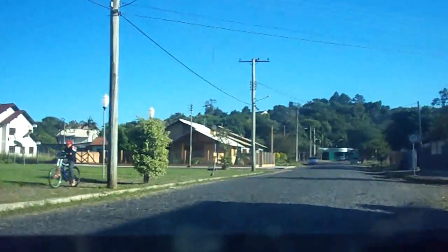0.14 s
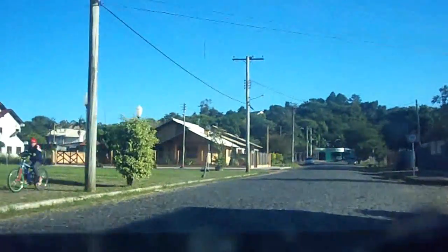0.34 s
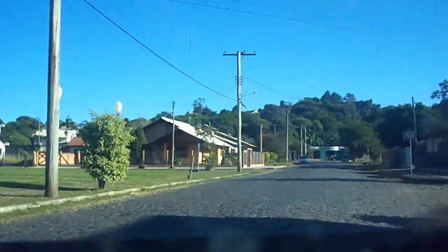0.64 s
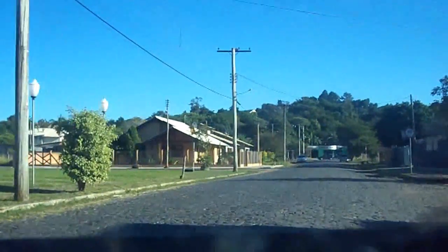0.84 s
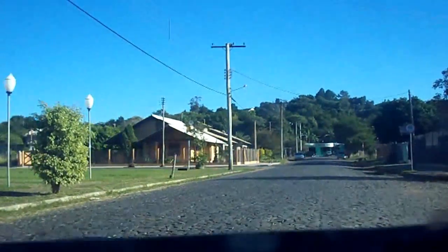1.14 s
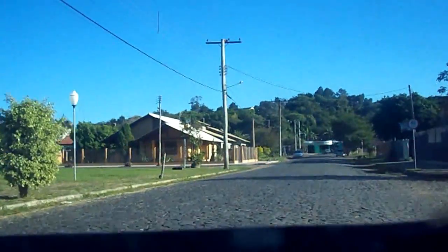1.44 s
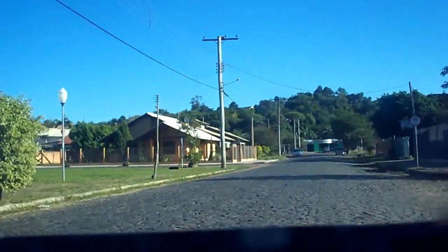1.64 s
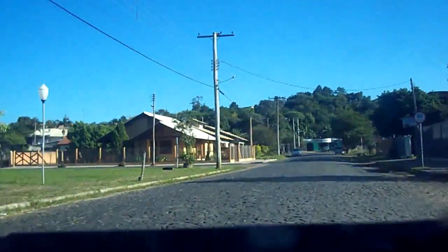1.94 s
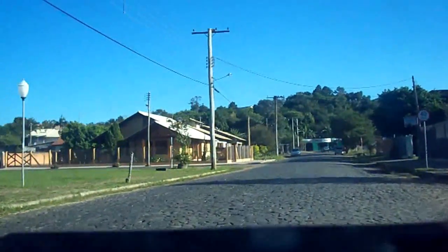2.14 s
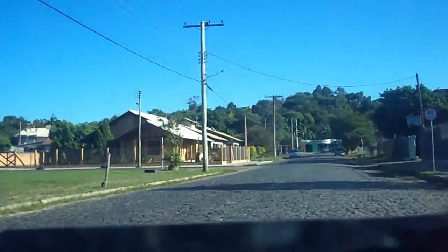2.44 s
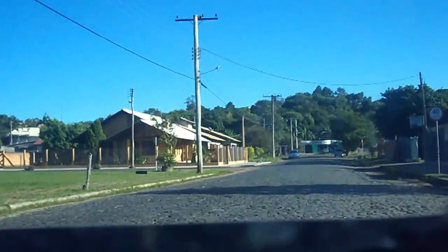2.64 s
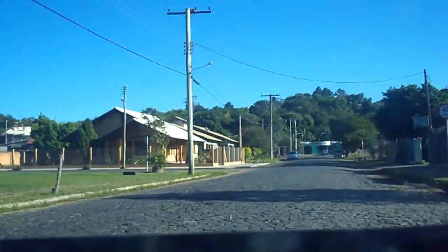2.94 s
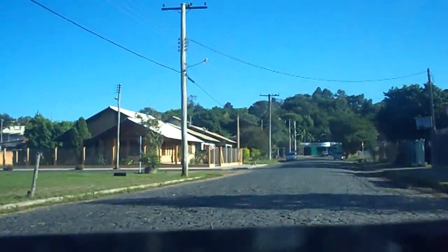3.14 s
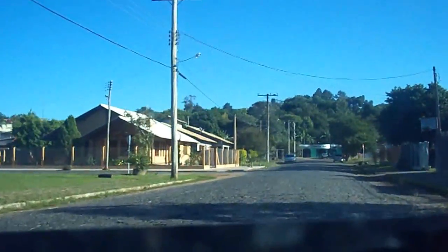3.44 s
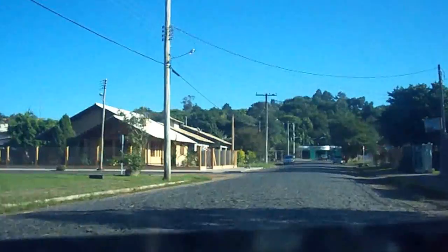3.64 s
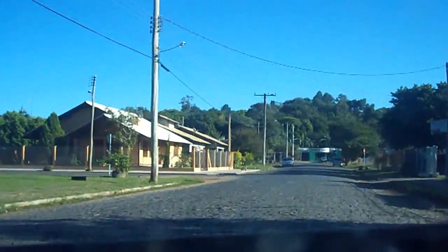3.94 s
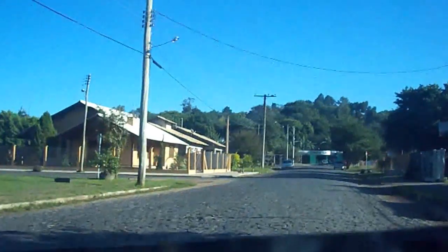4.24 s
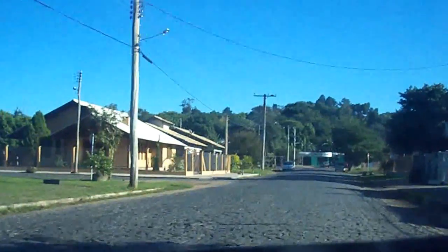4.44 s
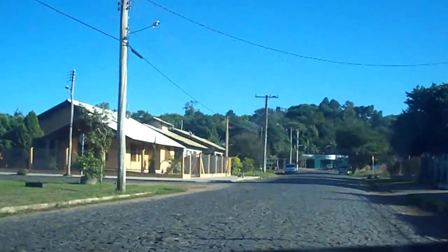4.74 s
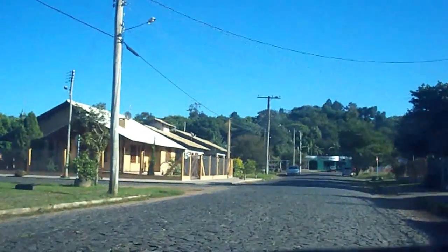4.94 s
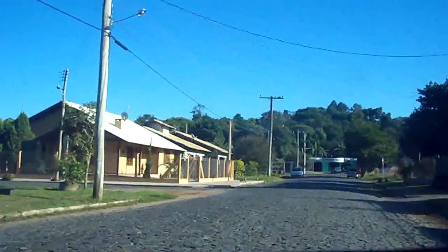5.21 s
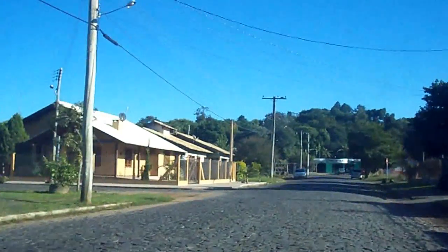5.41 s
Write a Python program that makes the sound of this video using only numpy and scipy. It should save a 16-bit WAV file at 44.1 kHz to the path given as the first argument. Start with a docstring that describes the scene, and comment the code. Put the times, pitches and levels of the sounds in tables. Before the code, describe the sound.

A car drives steadily over cobbles, heard from within. The body shudders deeply about thirty times a second, the cabin booms irregularly at bumps, and tyres hiss and drum. Hard plastic clacks and short hollow thuds rattle over it, dense early, sparser after, densest just past mid-way, then in uneven bursts to the end. Close, dry interior; strong bass clips roughly.

```python
"""Inside a car on cobblestones, microphone in the cabin: engine hum, tyre roar, boom and a body shake near 29 Hz.
At once loose plastic lands with hard ticks, about one per shake, and a hollow panel thuds, falling in pitch.
After 0.6 s the knocks thin out; the densest hard run comes from 2.8 to 3.5 s, then scattered bursts to the end.
Hum and shake are jostled sines, the road is shaped noise, small parts are random grains, rattles are struck modes.
The summed swings clip flat as the microphone overloads, and the top is cut."""
import sys
import numpy as np
from scipy import signal
from scipy.fft import rfft, irfft, next_fast_len
from scipy.io import wavfile

SR = 44100
rng = np.random.default_rng(int(sys.argv[2]) if len(sys.argv) > 2 else 0)


def master(y):
    """Save y as 16-bit WAV."""
    cut = np.clip(np.atleast_2d(y).T, -1, 1)
    pcm = np.round(cut * 32767)  # scale
    wavfile.write(sys.argv[1], SR, pcm.astype(np.int16))


N = 245637
TIME = np.arange(N) / SR


def from_db(db):
    """Decibels to gain."""
    return 10 ** (np.asarray(db) / 20)


def rms_one(x):
    """Scale to unit rms."""
    return x / np.sqrt(np.mean(x ** 2) + 1e-20)


def curve(rows, s=TIME):
    """Straight lines through (t/s, level/dB) rows, read at the moments s."""
    return np.interp(s, *np.transpose(rows))


def coloured(x, spectrum):
    """Filter a signal to a spectrum with sloping skirts beyond its ends; rms 1."""
    hz, level_db = np.transpose(spectrum)
    size = next_fast_len(N, True)
    bins = np.maximum(np.arange(size // 2 + 1) * SR / size, 1)
    gain = from_db(np.interp(np.log(bins), np.log(hz), level_db))
    low_skirt = np.minimum(bins / hz[0], 1) ** 2
    high_skirt = np.minimum(hz[-1] / bins, 1) ** 2
    return rms_one(irfft(rfft(x, size) * gain * low_skirt * high_skirt, size)[:N])


def noise(spectrum):
    """Noise of a given spectrum; rms 1."""
    return coloured(rng.standard_normal(N), spectrum)


def drift(rate_hz):
    """Slow random wander with rms 1."""
    return noise([(rate_hz / 10, 0), (rate_hz, 0)])


def clicks(times, heights):
    """One impulse per contact."""
    out = np.zeros(N)
    places = np.clip(np.round(times * SR).astype(int), 0, N - 1)
    np.add.at(out, places, heights)
    return out


def ring(blows, hz, t60):
    """Two-pole resonator: a unit click sets a decaying sine of height 1 ringing."""
    radius = from_db(-60 / (t60 * SR))
    angle = 2 * np.pi * hz / SR
    return signal.lfilter([0, np.sin(angle)], [1, -2 * radius * np.cos(angle), radius ** 2], blows + 1e-18)


def decays(blows, decay_s):
    """Each click becomes an exponential decay, an envelope for noise."""
    return signal.lfilter([1], [1, -np.exp(-1 / (decay_s * SR))], blows + 1e-18)


def cabin(x, t60, wet_db):
    """Close glass and trim add a short spray of reflections after 2 ms."""
    t = TIME[:SR // 5]
    tail = rng.standard_normal(len(t)) * from_db(-60 * t / t60) * (t > .002)
    tail /= np.sqrt(np.sum(tail ** 2))
    return x + from_db(wet_db) * signal.fftconvolve(x, tail)[:N]


def vibration(levels, turns, jostle_turns, flutter_db):
    """A sine that follows its level curve; the stones jostle its timing and strength."""
    strength = from_db(curve(levels) + flutter_db * drift(12.0))
    phase = turns + jostle_turns * drift(7.66)
    return np.sqrt(2) * strength * np.sin(2 * np.pi * phase)


# steady road wash, spectrum: f/Hz, level/dB (relative, per Hz)
WASH_SPECTRUM = [(600, 15), (1200, 2.5), (2400, -7), (4500, -3), (7500, -7.5), (9500, -15)]
WASH_DB = -53.5


def road_wash():
    """Steady shaped noise from the road beneath everything."""
    return from_db(WASH_DB) * noise(WASH_SPECTRUM)


# treble hiss of the tyres: t/s, level/dB (before HISS_DB)
HISS_LEVEL = [(0.02, -39), (0.53, -46.5), (1.57, -49), (1.89, -42), (2.06, -44), (2.69, -48.5), (3.08, -43),
              (3.36, -47), (3.47, -46), (3.62, -49), (3.76, -48), (4.72, -49.5), (5.18, -42.5), (5.57, -57)]
# treble of hiss, small parts and tick buzz: f/Hz, level/dB (relative, per Hz)
TREBLE_SPECTRUM = [(500, -2), (1300, 7.5), (2400, 8), (3000, 5.5), (3600, 6), (5000, 7), (6500, 5.5),
                   (7500, 2.5), (8500, -5.5), (10000, -27)]
HISS_DB = -4.5


def tyre_hiss(jolts, flutter_db=2.0):
    """Tyres hiss over the stones: treble noise that flutters with the jolts."""
    level_db = curve(HISS_LEVEL) + HISS_DB + flutter_db * jolts
    return from_db(level_db) * noise(TREBLE_SPECTRUM)


# engine hum: t/s, level/dB (before ENGINE_DB)
ENGINE_LEVEL = [(0.0, -9), (0.96, -18), (1.16, -10.5), (1.32, -21), (2.06, -16.5), (2.24, -31), (2.4, -12),
                (2.85, -18.5), (3.19, -14), (3.47, -28.5), (3.51, -17), (4.49, -29.5), (4.55, -15),
                (5.57, -19.5)]
ENGINE_HZ, ENGINE_DB = 48.56, -0.5   # the car holds its speed


def engine():
    """The engine hums on one low sine, unsteady in timing and strength."""
    return from_db(ENGINE_DB) * vibration(ENGINE_LEVEL, ENGINE_HZ * TIME, jostle_turns=0.11, flutter_db=5.5)


# wheel hop, spectrum: f/Hz, level/dB (relative, per Hz)
HOP_SPECTRUM = [(8, -20.5), (12, -16), (16, -1), (20, -6.5), (25, -7), (40, -20.5), (60, -20.5)]
HOP_DB = -16.0


def wheel_hop():
    """The wheels hop: very low noise, strongest near 16 Hz."""
    return from_db(HOP_DB) * noise(HOP_SPECTRUM)


# road roughness as tyre roar level, also driving small parts and light rattles: t/s, level/dB (before ROAR_DB)
ROUGHNESS = [(0.0, -16.5), (0.08, -34), (0.24, -39), (0.36, -23.5), (0.76, -39), (0.88, -24), (1.0, -42),
             (1.06, -27.5), (1.24, -36), (1.44, -34), (1.6, -29.5), (1.7, -39), (1.86, -34.5),
             (1.93, -30.5), (2.2, -29.5), (2.3, -38), (2.5, -31), (2.64, -38), (2.95, -25), (3.11, -36),
             (3.23, -25.5), (3.59, -33.5), (3.75, -21.5), (3.85, -45), (3.97, -29.5), (4.39, -32),
             (4.91, -31), (5.11, -37.5), (5.25, -25), (5.39, -36), (5.57, -35)]


def roughness(s):
    """Roughness of the road in dB at given moments."""
    return curve(ROUGHNESS, s)


# tyre roar, spectrum: f/Hz, level/dB (relative, per Hz)
ROAR_SPECTRUM = [(120, 6), (240, 4.5), (420, 4.5), (550, -4), (700, -4), (880, -9), (1150, -10.5),
                 (1600, -26.5), (2500, -28.5), (5000, -45)]
ROAR_DB = -1.5


def tyre_roar(jolts, lump_db=5.5):
    """Tyres drum over the stones: noise that follows the roughness and swells at each jolt."""
    return from_db(roughness(TIME) + ROAR_DB + lump_db * jolts) * noise(ROAR_SPECTRUM)


def grains(per_s, size_db):
    """Small contacts at random moments, a few much stronger than the rest."""
    sizes = from_db(size_db * np.minimum(rng.exponential(1, N), 3)) * rng.choice([-1, 1], N)
    return sizes * (rng.random(N) < per_s / SR)


CHATTER_DB, GRAIN_DB = -49.5, 3   # level on average road, and a trim added to it
CHATTER_FOLLOWS = 0.75   # share of the roughness swing


def small_fittings(jolts, clump_db=6.0):
    """Jolts stir small fittings into clumps of grains, close by, with a short cabin spray."""
    roar_db = roughness(TIME)
    level_db = CHATTER_DB + GRAIN_DB + CHATTER_FOLLOWS * (roar_db - roar_db.mean())
    contacts = grains(per_s=970, size_db=10.5) * from_db(clump_db * np.minimum(jolts, 1))
    chatter = coloured(contacts, TREBLE_SPECTRUM)
    return from_db(level_db) * cabin(chatter, t60=0.027, wet_db=-17.5)


def road():
    """Tyres and small fittings share the same random jolts over a steady wash."""
    jolts = drift(50)
    return road_wash() + tyre_hiss(jolts) + tyre_roar(jolts) + small_fittings(jolts)


# bumps where the cabin boom surges: t/s, level/dB (before SURGE_DB and BOOM_DB)
SURGES = [(0.038, -11.5), (0.23, -20), (0.35, -19), (0.66, -13.5), (0.89, -12), (1.07, -18), (1.62, -16.5),
          (2.06, -11.5), (2.3, -15), (2.461, -11), (2.87, -17), (3.03, -16), (3.26, -13.5), (3.44, -14),
          (3.66, -18.5), (3.919, -14.5), (4.109, -20), (4.39, -25), (4.5, -15.0), (4.69, -19.5), (4.8, -18),
          (4.92, -14.5), (5.36, -21), (5.51, -21.5)]
# cabin boom, spectrum: f/Hz, level/dB (relative, per Hz)
BOOM_SPECTRUM = [(45, -13.5), (65, -0.5), (90, -0.5), (115, -4.5), (140, -2.5), (200, -13), (260, -15),
                 (400, -28.5)]
SURGE_S, SURGE_DB = 0.034, -3.5   # time constant of the bell-shaped power, and trim
STEADY_BOOM_DB, BOOM_DB = -22, 0   # boom between surges, and trim of both


def suspension():
    """The cabin booms all the time and surges as the suspension takes each bump."""
    power = from_db(STEADY_BOOM_DB) ** 2
    for s, level_db in SURGES:
        power = power + from_db(level_db + SURGE_DB) ** 2 * np.exp(-((TIME - s) / SURGE_S) ** 2)
    return from_db(BOOM_DB) * np.sqrt(power) * noise(BOOM_SPECTRUM)


SHAKE_HZ, SHAKE_DB = 29.31, -0.28   # nominal rate: the car holds its speed
LANDING_TURN = 0.54   # where in the swing the plastic lands, in turns: on the way down


def landings():
    """Times of the hard landings: the strongest contact of each swing."""
    s, level_db = np.transpose(TICKS)
    same_swing = np.abs(s[:, None] - s) < .022
    strongest_db = np.where(same_swing, level_db, -np.inf).max(axis=1)
    return s[level_db >= strongest_db]


def shake_turns():
    """Swings of the body counted over time; a whole number of them passes between two hard landings."""
    s = np.r_[0, landings(), TIME[-1]]
    swings = np.maximum(np.round(np.diff(s) * SHAKE_HZ), 1)
    return np.interp(TIME, s, np.r_[0, np.cumsum(swings)])


# body shake: t/s, level/dB (before SHAKE_DB)
SHAKE_LEVEL = [(0.0, -5.5), (0.26, -4), (0.62, -23.5), (0.7, -6), (1.58, -12.5), (1.62, -8.5), (2.4, -8),
               (2.44, -14), (2.74, -5.5), (2.81, -21), (2.89, -5.5), (2.99, -24), (3.07, -6.5),
               (3.53, -9.5), (3.57, -16), (3.67, -7.5), (3.91, -18.5), (4.01, -10), (4.39, -10.5),
               (4.82, -5.5), (4.91, -6), (5.31, -8), (5.57, -18)]


def body_shake():
    """The body shakes: a deep sine in step with the landings of the plastic."""
    turns = shake_turns() + LANDING_TURN
    return from_db(SHAKE_DB) * vibration(SHAKE_LEVEL, turns, jostle_turns=0.055, flutter_db=2.0)


LIGHT_KNOCKS_PER_S = 36.0   # approximate rate, before those near hard knocks are left out
LIGHT_KNOCK_DB, LIGHT_KNOCK_SPREAD_DB = 4, 1   # level over the roughness curve
KNOCK_GAP_S = .014   # no light knock sounds within this time before or after a hard knock, so each stands clear


def light_knocks(unevenness=0.38):
    """Between the hard knocks single stones jolt the panel, as strongly as the road is rough; rows as in KNOCKS."""
    chance = rng.standard_normal((320, 2))
    s = np.cumsum(np.exp(unevenness * chance[:, 0])) / LIGHT_KNOCKS_PER_S
    level_db = roughness(s) + LIGHT_KNOCK_DB + LIGHT_KNOCK_SPREAD_DB * np.minimum(chance[:, 1], 2)
    hard_s = np.array(KNOCKS)[:, 0]
    clear = np.abs(s[:, None] - hard_s).min(axis=1) > KNOCK_GAP_S
    return np.c_[s, level_db][clear & (s < TIME[-1])]


THUD_S = 0.0099   # half a sine of swell
THUD_START_HZ, THUD_END_HZ, THUD_FALL_S = 775, 379.7, 0.0026   # before each knock's own pitch factor


def thud(level_db, pitch):
    """The panel flexes and high bending waves arrive first: a swell falls in pitch and dies in a few cycles."""
    t = TIME[:SR // 40]
    hz = pitch * (THUD_END_HZ + (THUD_START_HZ - THUD_END_HZ) * np.exp(-t / THUD_FALL_S))
    swell = np.sin(np.pi * np.minimum(t / THUD_S, 1))
    return -from_db(level_db) * swell * np.sin(2 * np.pi * np.cumsum(hz) / SR)


# hollow panel knocks at the jolts: t/s, level/dB (thud peak, before KNOCK_DB)
KNOCKS = [(0.1634, -12), (0.177, -13.5), (0.263, -12), (0.291, -22), (0.3379, -9.5), (0.3758, -4.5),
          (0.4102, -10), (0.4511, -11), (0.4802, -10), (0.582, -10.5), (0.8371, -17.5), (0.8892, -21),
          (0.9178, -12.5), (1.0162, -13.5), (1.037, -20), (1.073, -21.5), (1.142, -18.5), (1.5157, -16.5),
          (1.5678, -22), (1.601, -13.5), (1.9398, -18.5), (1.9669, -18), (2.0128, -16), (2.0884, -16.5),
          (2.1946, -19), (2.2215, -21.5), (2.4444, -16), (2.522, -18.0), (2.551, -23.5), (2.7928, -21),
          (2.8513, -17), (2.8911, -3), (2.9253, -9.5), (2.9618, -13), (3.0162, -27), (3.0412, -7),
          (3.142, -21), (3.1772, -7), (3.2187, -8.5), (3.2545, -4), (3.291, -10.5), (3.3217, -18),
          (3.3537, -20), (3.3972, -14), (3.457, -18.5), (3.5008, -11.5), (3.694, -24), (3.7145, -7.5),
          (3.7522, -7.5), (3.7815, -13), (3.991, -18), (4.0376, -20.5), (4.0685, -16.5), (4.1567, -18.5),
          (4.1941, -15.5), (4.2793, -15.5), (4.3145, -18.5), (4.343, -21), (4.4789, -4), (4.4996, -18.5),
          (4.6004, -18), (4.6465, -16), (4.6846, -11), (4.7095, -17), (4.7605, -8.5), (4.8414, -8.5),
          (4.876, -14), (4.8981, -20), (4.9145, -15.5), (5.0489, -20.0), (5.2206, -9), (5.256, -10.5),
          (5.5159, -10.5), (5.5305, -18)]
# what a knock rings on with: f/Hz, level/dB (relative to the knock), t60/s
PANEL_MODES = [(284, -14.5, 0.093), (413, -12, 0.068), (476.3, -12.5, 0.071), (624, -15.5, 0.055),
               (635, -26.5, 0.011), (1149, -16.5, 0.041), (1350, -23, 0.0066), (1580, -29.5, 0.067),
               (2460, -37, 0.0075)]
# brief clack of a knock, spectrum: f/Hz, level/dB (relative, per Hz)
CLACK_SPECTRUM = [(700, 1.5), (1100, 6), (1700, 0.5), (2600, -12), (4500, -18), (7500, -27)]
CLACK_DB, CLACK_S = -19, 0.0046   # level relative to the knock's row, decay time constant
KNOCK_DB = -0.36   # trim of thud and ring


def knocks(scatter_db=3.5, pitch_spread=0.059, ring_delay_s=0.001826):
    """Each jolt flexes a hollow panel, never quite at the same pitch; a brief clack and the panel's ring go with it."""
    s, level_db = np.vstack([KNOCKS, light_knocks()]).T
    chance = rng.standard_normal((400, 1 + len(PANEL_MODES)))[:len(s)]
    pitches = np.exp(pitch_spread * chance[:, -1])
    panel = np.zeros(N)
    for start, one_db, pitch in zip((s * SR).astype(int), level_db, pitches):
        flex = thud(one_db, pitch)[:N - start]
        panel[start:start + len(flex)] += flex
    for k, (hz, mode_db, t60) in enumerate(PANEL_MODES):
        blows = from_db(level_db + mode_db + scatter_db * chance[:, k])
        panel += ring(clicks(s + ring_delay_s, blows), hz, t60)
    clack = decays(clicks(s, from_db(level_db + CLACK_DB)), CLACK_S) * noise(CLACK_SPECTRUM)
    return from_db(KNOCK_DB) * panel + clack


LIGHT_TICK_DB, LIGHT_TICK_SPREAD_DB = -9, 10.5   # level over the roughness curve


def light_ticks(stagger_s=0.0037):
    """On the other swings the plastic lands lightly, as strongly as the road is rough; rows as in TICKS."""
    turns = shake_turns()
    chance = rng.standard_normal((2, 300))
    hard = np.round(np.interp(landings(), TIME, turns)).astype(int)
    light = np.setdiff1d(np.arange(1, int(turns[-1])), hard)
    s = np.interp(light, turns, TIME) + stagger_s * chance[0, light]
    spread_db = LIGHT_TICK_SPREAD_DB * np.minimum(chance[1, light], 1)
    return np.c_[s, roughness(s) + LIGHT_TICK_DB + spread_db]


# hard contacts of the loose plastic, landings and loud bounces: t/s, level/dB (before modes and TICK_DB)
TICKS = [(0.1324, -19), (0.1673, -10), (0.173, -23), (0.2667, -11), (0.3041, -12), (0.3126, -16),
         (0.3462, -5), (0.3558, -13), (0.3861, 8.5), (0.3975, -14), (0.4221, -24), (0.4936, -13),
         (0.5359, -18), (0.5653, -18), (0.5763, -14.5), (0.6229, -23), (0.8655, -11), (0.878, -29),
         (0.9293, -16.5), (0.9923, -18.5), (0.9986, -23), (1.0253, -30), (1.0703, -31), (1.1002, -22),
         (1.1284, -13.5), (1.3909, -21.5), (1.5028, -22), (1.5341, -20), (1.5804, -10), (1.5881, -37),
         (1.6154, -9), (1.9152, -11), (1.9253, -22), (1.954, -17.5), (1.9972, -16), (2.0066, -28),
         (2.0284, -6), (2.0362, -28), (2.0669, -15), (2.1029, -15.5), (2.1397, -10), (2.1773, -8.5),
         (2.1872, -32), (2.21, -14.5), (2.2469, -20.5), (2.4106, -19), (2.4484, -14), (2.4727, -19),
         (2.4796, -25), (2.5052, -17), (2.5413, -21), (2.6359, -15), (2.8186, -12.5), (2.8598, -5),
         (2.8695, -25), (2.8956, -15.5), (2.9081, -20), (2.9355, -16), (2.9455, -28), (2.9733, -6),
         (2.9835, -19), (3.0114, -6), (3.0205, -17.5), (3.0436, -17), (3.1541, -5.5), (3.1899, -8),
         (3.1973, -21), (3.2297, -9), (3.2381, -22), (3.2648, -13), (3.2754, -13), (3.3087, -5),
         (3.3155, -28), (3.3412, -16), (3.3494, -29), (3.3783, -10), (3.4191, -15.5), (3.4472, -12.5),
         (3.4822, -13), (3.5139, -10), (3.6533, -30), (3.6865, -19), (3.6973, -19), (3.7616, -23),
         (3.7752, -23), (3.9405, -23), (3.9808, -22.5), (4.1149, -30), (4.1375, -23), (4.1584, -24),
         (4.1751, -13.5), (4.3, -7.5), (4.3289, -23), (4.4517, -18), (4.4837, -16), (4.4972, -15),
         (4.5237, -11), (4.5771, -15.5), (4.6313, -21.5), (4.6654, -21), (4.6818, -26), (4.6983, -11),
         (4.7406, -10), (4.8235, -15), (4.8975, -6.5), (4.9177, -20), (4.9378, -7), (4.9671, -21.5),
         (5.0382, -17), (5.1606, -11.5), (5.2023, -9.5), (5.2149, -24), (5.2384, -7.5), (5.2701, -10),
         (5.309, -24), (5.4978, -9), (5.5288, -16), (5.5579, -22)]
# what a tick rings with: f/Hz, level/dB (relative to the contact), t60/s
TICK_MODES = [(393, 0.5, 0.018), (575, 7, 0.012), (1400, -6.5, 0.013), (1768, -14, 0.012),
              (2450, -4.5, 0.004), (3513, -6.5, 0.0046), (4177, -13.5, 0.0076), (5740, -10, 0.0042),
              (6304, -4.5, 0.0055), (7000, -25.5, 0.023)]
TICK_DB = -5


def ticks(scatter_db=1.75, soft_dulling=0.42, bounce_s=.0095, bounce_spread=.08, bounce_db=-21,
          hard_db=-14, buzz_db=-19, buzz_s=0.0035):
    """Loose plastic lands, buzzes for an instant and settles with a faint bounce; weak contacts are duller."""
    s, level_db = np.vstack([TICKS, light_ticks()]).T
    chance = rng.standard_normal((400, 1 + 2 * len(TICK_MODES)))[:len(s)]
    # every contact is followed by its bounce
    s = np.r_[s, s + bounce_s * np.exp(bounce_spread * chance[:, 0])]
    level_db = np.r_[level_db, level_db + bounce_db]
    scatter = np.vstack(np.hsplit(chance[:, 1:], 2))
    # weak contacts gain in the buzz and the modes below 5 kHz, so they sound duller; hard ones lose there
    dull_db = soft_dulling * (hard_db - level_db)
    buzz = decays(clicks(s, from_db(level_db + dull_db + buzz_db)), buzz_s)
    out = buzz * noise(TREBLE_SPECTRUM)
    for k, (hz, mode_db, t60) in enumerate(TICK_MODES):
        blows_db = level_db + mode_db + dull_db * (hz < 5000) + scatter_db * scatter[:, k]
        out = out + ring(clicks(s, -from_db(blows_db)), hz, t60)
    return from_db(TICK_DB) * out


def scene():
    """Engine, wheel hop, road, suspension, body shake and rattles at the cabin microphone."""
    background = engine() + wheel_hop() + road() + suspension()
    rattles = cabin(knocks() + ticks(), t60=0.19, wet_db=-27.0)
    return (background + body_shake() + rattles)[None]


OVERLOAD, CUTOFF_HZ = .91, 9100   # clipping level (full scale 1), where the top is cut


def record(dry):
    """The microphone overloads: the biggest swings are clipped flat; then the top is cut."""
    clipped = np.clip(dry, -OVERLOAD, OVERLOAD)
    return signal.sosfilt(signal.butter(14, CUTOFF_HZ, fs=SR, output="sos"), clipped)


dry = scene()
out = record(dry)
master(out)
```